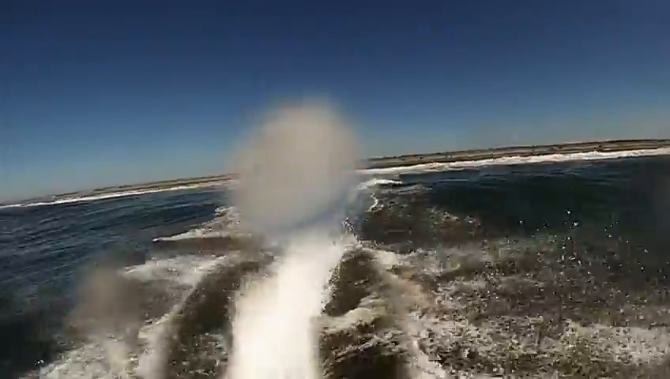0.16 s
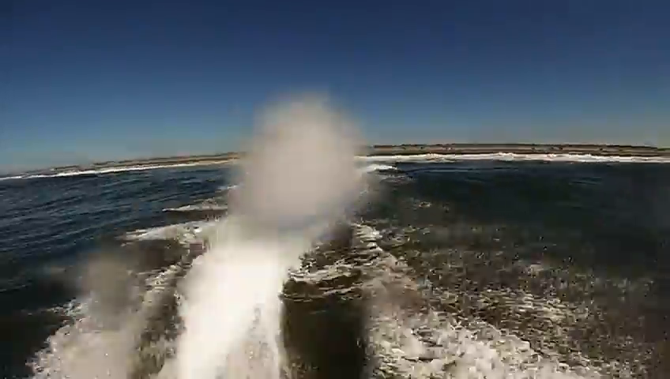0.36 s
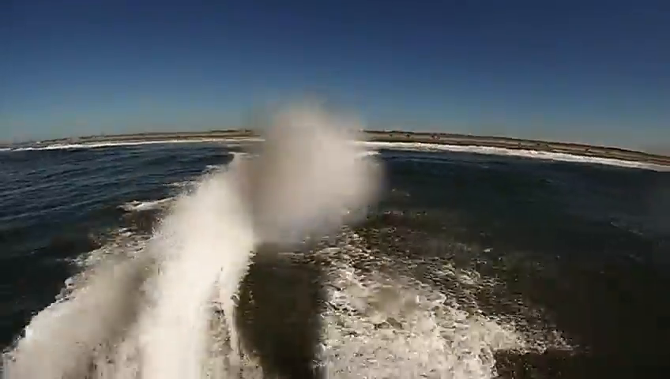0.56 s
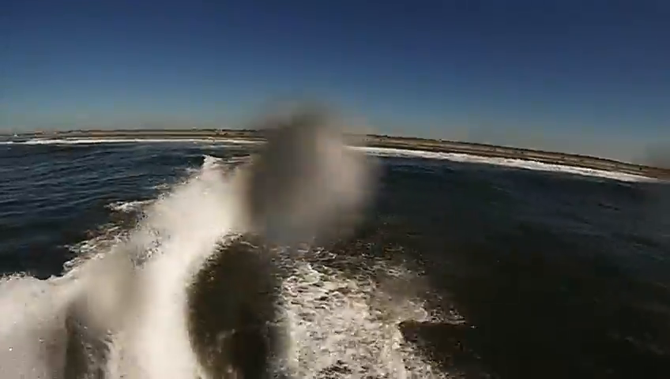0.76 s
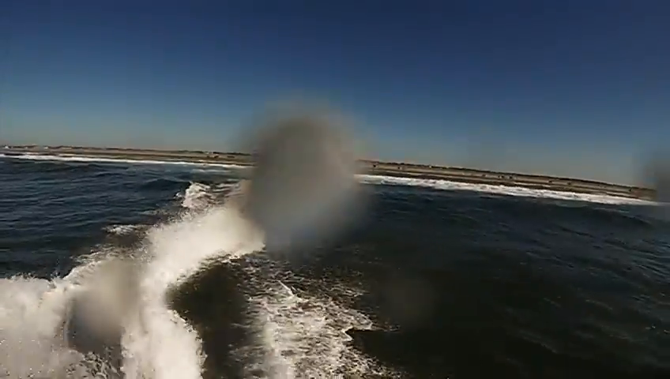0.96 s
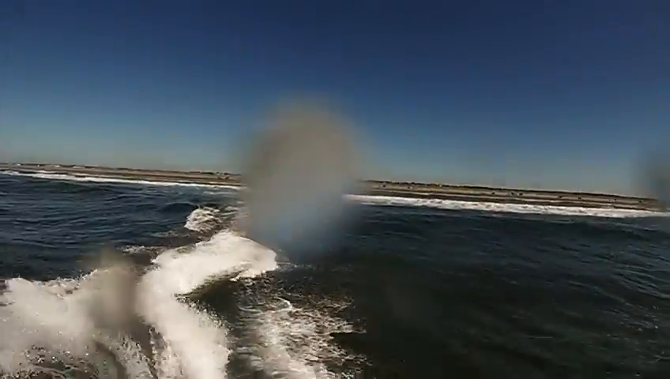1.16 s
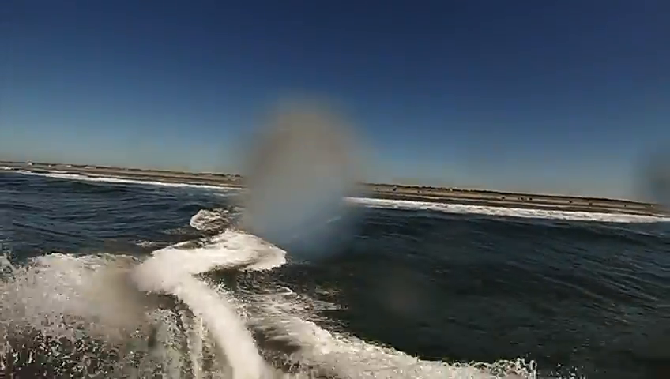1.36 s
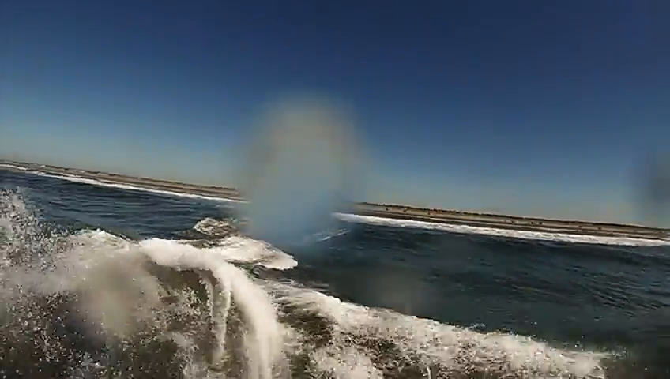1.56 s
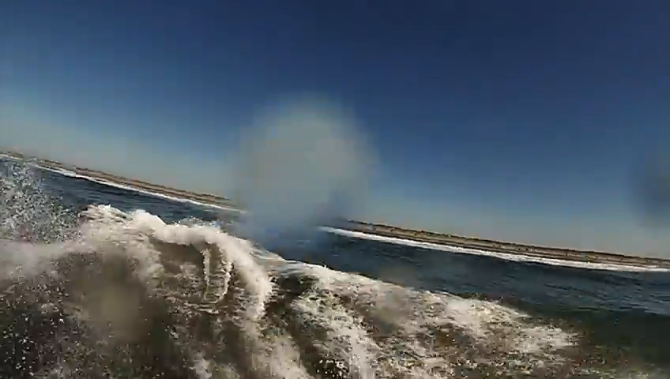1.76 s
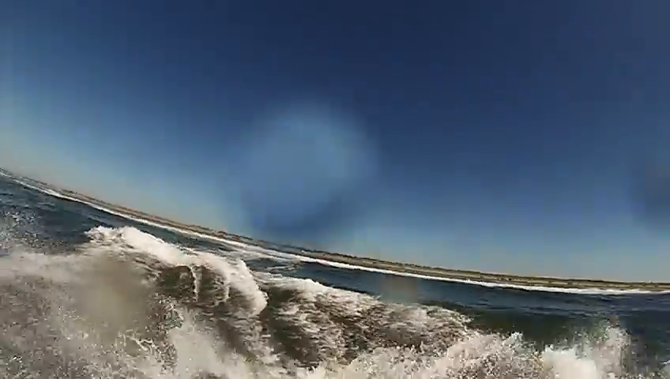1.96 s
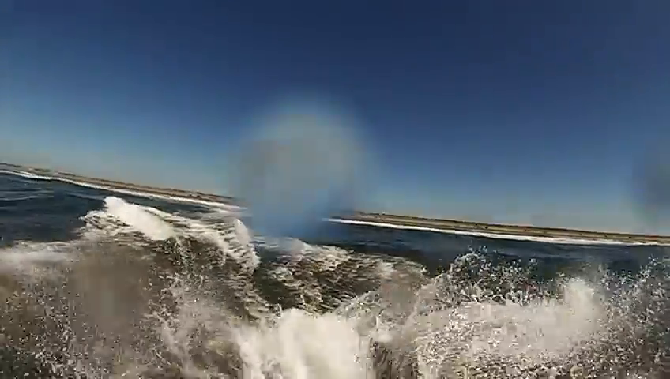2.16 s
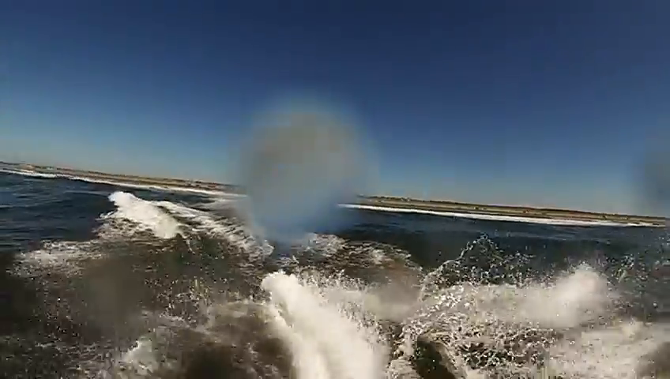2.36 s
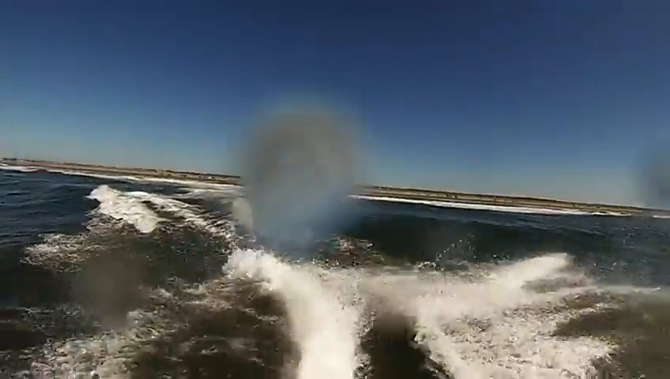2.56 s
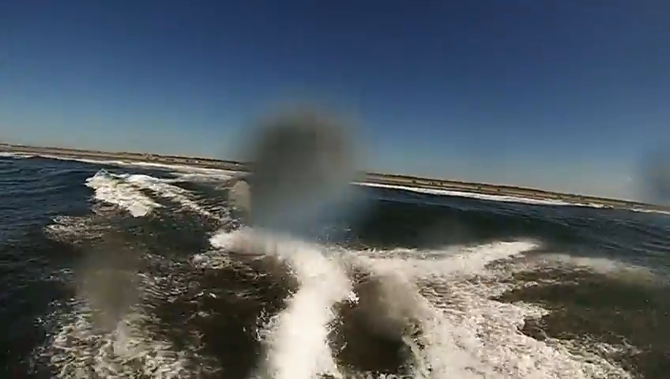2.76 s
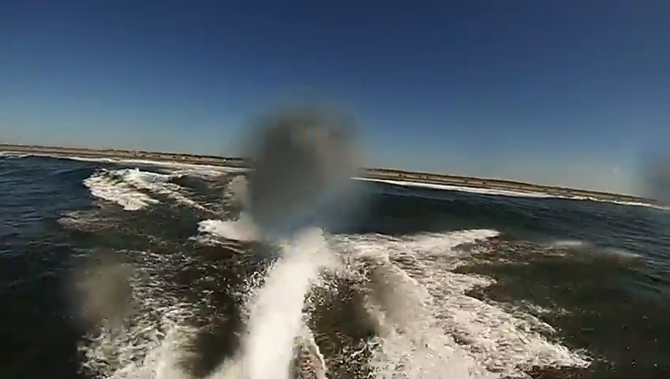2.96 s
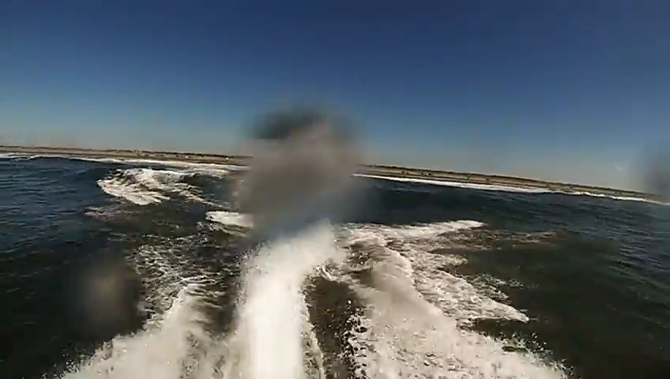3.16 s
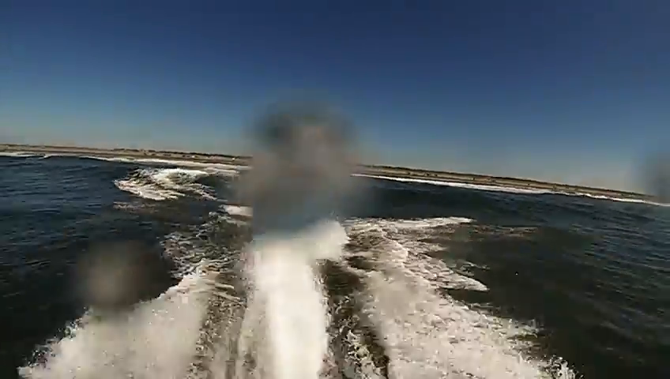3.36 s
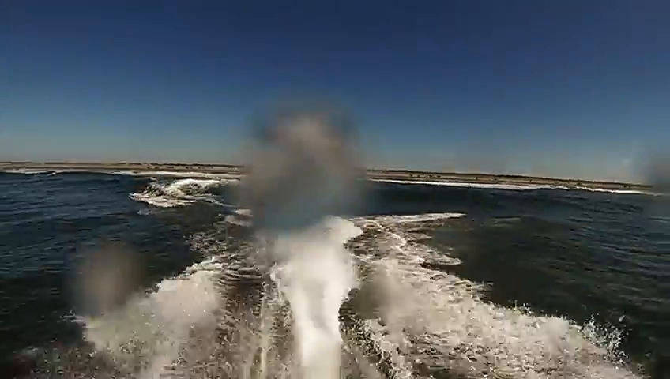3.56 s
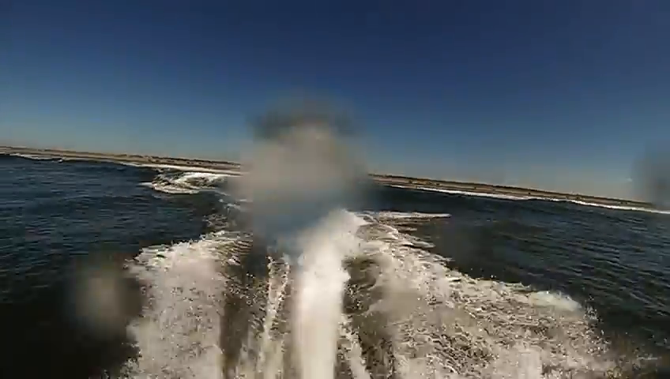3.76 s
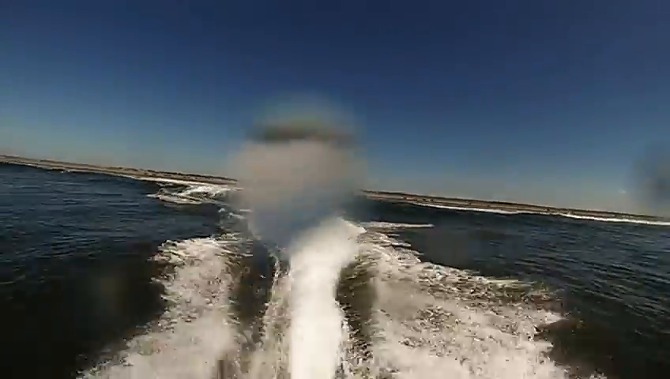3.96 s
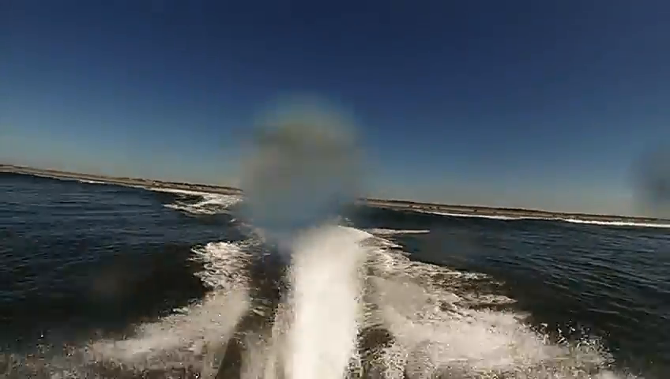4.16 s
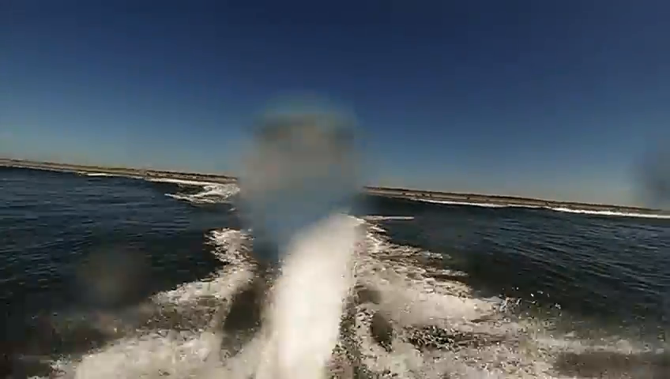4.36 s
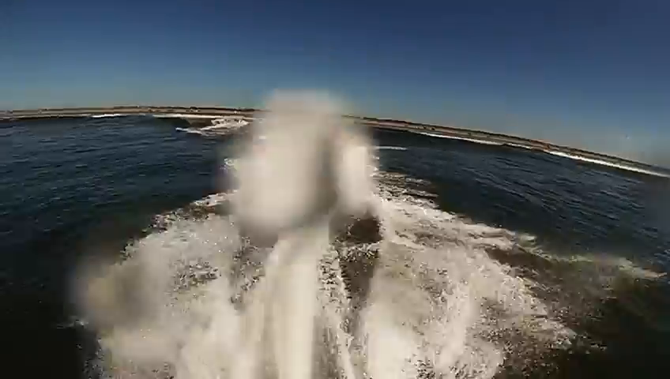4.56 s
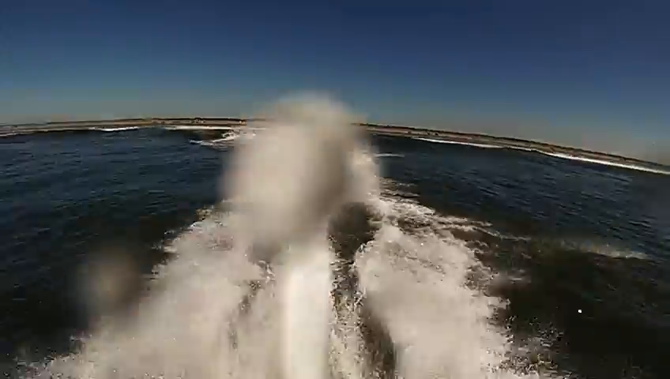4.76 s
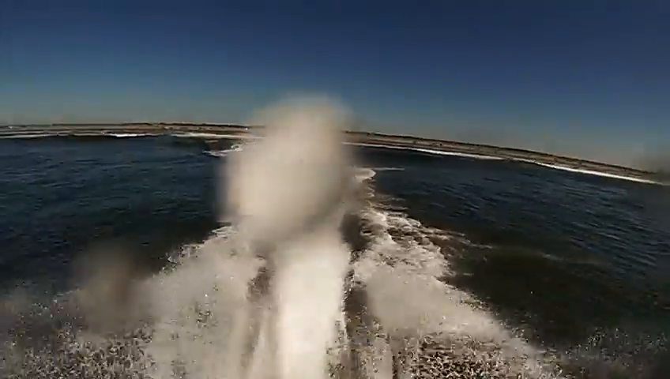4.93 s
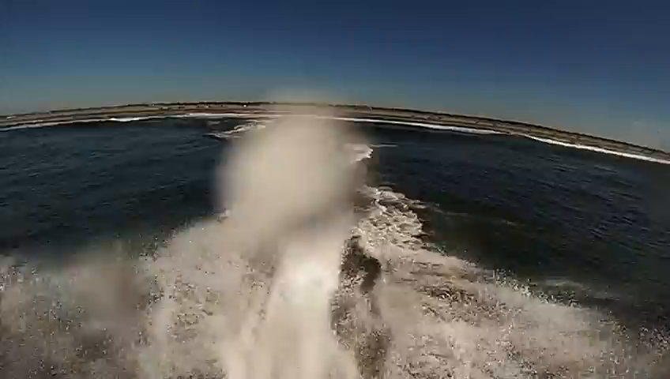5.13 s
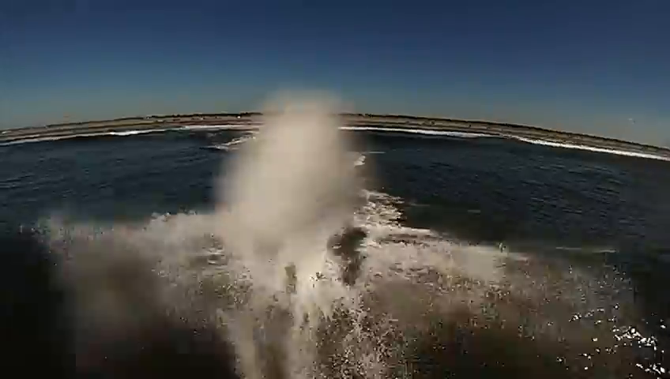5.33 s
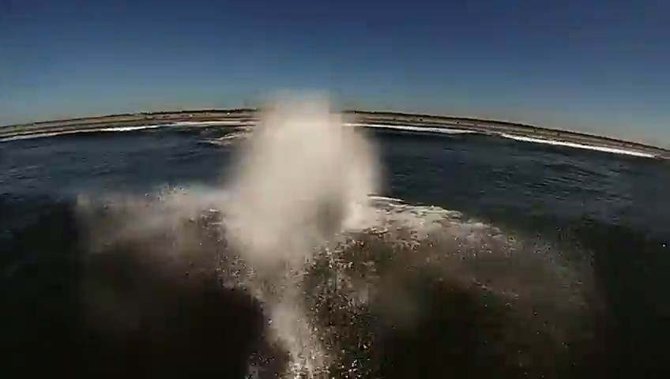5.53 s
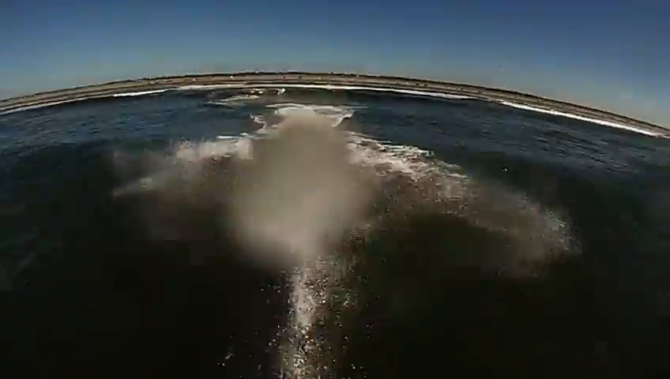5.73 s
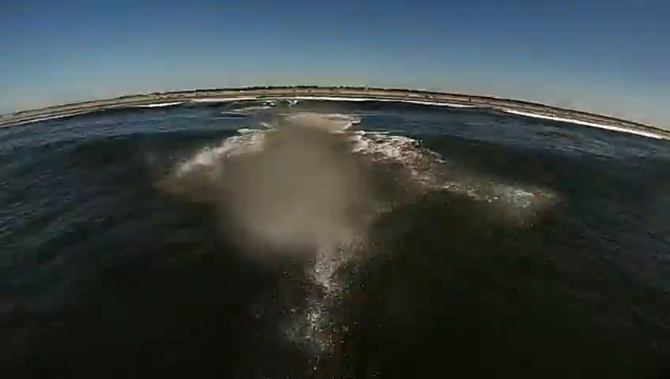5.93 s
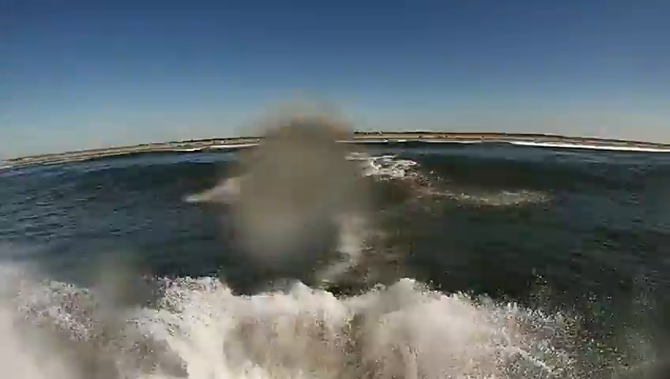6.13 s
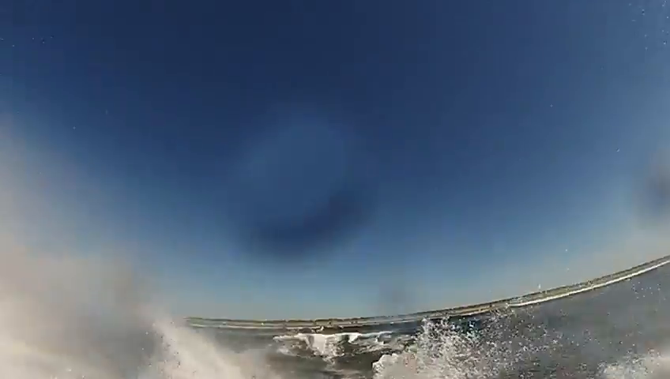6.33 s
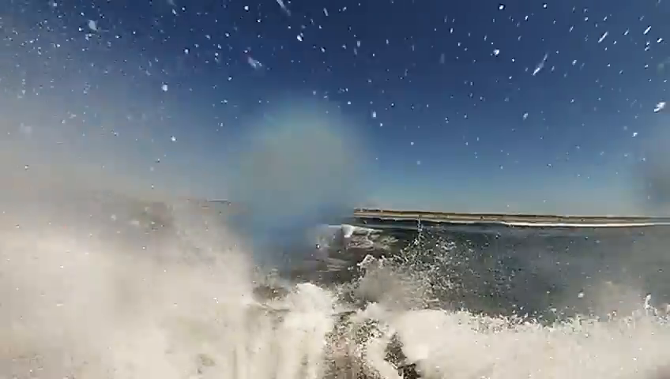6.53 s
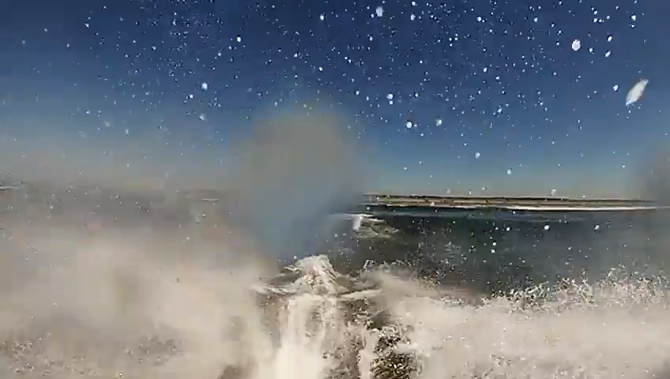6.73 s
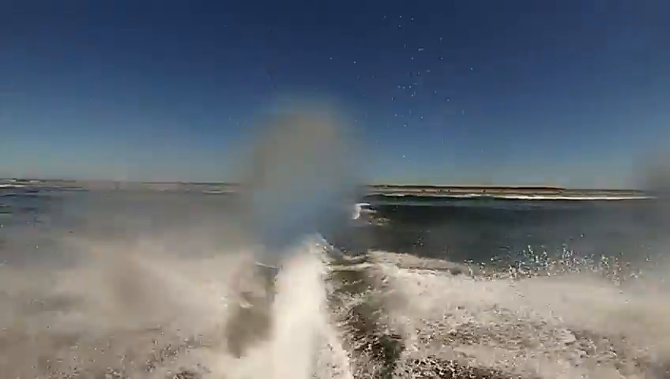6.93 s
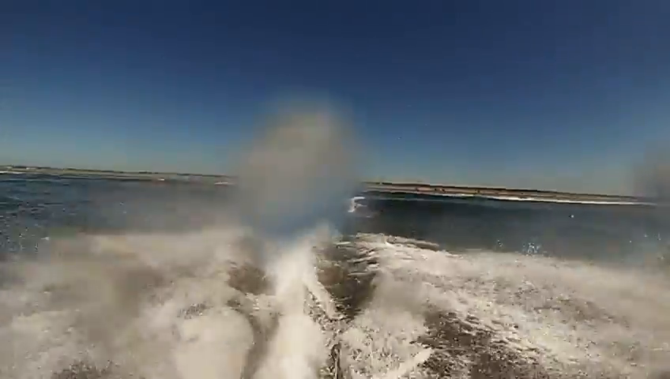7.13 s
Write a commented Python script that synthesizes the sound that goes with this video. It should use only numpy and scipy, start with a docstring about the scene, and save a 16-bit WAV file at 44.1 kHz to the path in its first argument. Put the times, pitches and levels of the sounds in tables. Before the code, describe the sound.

Close at a small watercraft's stern, a buzzing engine revs and eases under roaring wash, with heavy booming hull slaps and a late patter of drops.

```python
"""Personal watercraft in surf

Heard from a waterproof camera on the stern: a three-cylinder engine, summed from crankshaft harmonics,
revs and eases under the filtered noise of wash, jet, foam and mist, while the camera mount drones.
Decaying sines and noise bursts form the hull's slams after two jumps; then thrown water rattles on
the housing as short damped rings, and a gliding tone gurgles as the stern settles."""
import sys
import numpy as np
from scipy.fft import rfft, irfft, next_fast_len
from scipy.io import wavfile
from scipy.ndimage import uniform_filter1d, map_coordinates

SR = 44100
rng = np.random.default_rng(int(sys.argv[2]) if len(sys.argv) > 2 else 0)


def file_out(sig):
    """Save sig as 16-bit WAV at sys.argv[1]."""
    # one column per channel
    cols = np.atleast_2d(sig).T
    # limit, then scale
    lim = np.clip(cols, -1, 1)
    pcm = np.round(lim * 32767).astype(np.int16)
    wavfile.write(sys.argv[1], SR, pcm)


N = 317079  # length [samples]

# Two throttle blips, then the run-up to the big jump; after it the sunken stern muffles the exhaust:
# (time [s], crankshaft rate [Hz], exhaust gain [dB])
ENGINE_COURSE = [(0, 79.3, -52), (.14, 87.8, -33), (.26, 97.2, -34), (.38, 100.9, -35.5), (.5, 98.9, -32.5),
                 (.62, 85.5, -30), (.74, 75.45, -44), (.93, 64, -38), (1.08, 58, -63), (2.06, 59.8, -58),
                 (2.18, 78.9, -43.5), (2.29, 88.2, -34.5), (2.42, 94.45, -31.5), (2.53, 92.1, -30),
                 (2.72, 86.2, -30.5), (2.9, 84.34, -34), (3.08, 85.1, -32.5), (3.25, 88.3, -32),
                 (3.42, 92.66, -28.5), (3.75, 92.5, -33.5), (3.9, 96.1, -40.5), (4.1, 107, -37),
                 (4.28, 115.7, -41), (4.6, 119.7, -37), (4.8, 123.5, -42), (5.7, 124.2, -42),
                 (6.1, 119, -59), (6.7, 100, -52), (6.94, 98.7, -41), (7.0, 99, -49), (7.19, 99, -56)]
# Engine orders: (multiple of crankshaft rate, level at throttle share 0 [dB], level at share 1 [dB])
ENGINE_ORDERS = [(1.5, -5.5, 4.5), (2, -24, -14), (2.5, -28, -3), (3, 1, -6), (4, -30, -3), (4.5, -13, -10),
                 (5.5, -28, -4), (6, -21.5, -7), (7, -28, -13), (7.5, -21, -9), (8, -29, -11), (9, -30, -9),
                 (9.5, -26, -8), (10.5, -25, -6), (12, -25, -5)]
# Throttle share against engine speed: (crankshaft rate [Hz], share [0-1])
THROTTLE_SHARE = [(106, 0.0083), (114, 0.79)]
# Hull resonances: (frequency [Hz], width [Hz], level [dB])
HULL_MODES = [(174.7, 4.2, 2), (384, 9.2, -14), (570, 30, 0), (685.7, 30, -1.5), (733, 23, -1)]
FLYWHEEL_S = 0.062  # averaging time by which the engine's inertia rounds off speed changes
FIRING_JITTER_RAD = 0.03

# Rush of water swelling with speed: (time [s], wash level before gain [dB], jet level before gain [dB])
WATER_COURSE = [(0, -37.5, -46), (.45, -36.5, -46), (.87, -39, -46.5), (1.37, -46, -65), (1.7, -45.5, -58),
                (2.05, -46.5, -60), (2.33, -39, -49), (2.94, -38.5, -44), (3.24, -36, -41.5),
                (3.85, -34.5, -39.5), (4.15, -32, -34), (4.5, -31, -35.5), (4.94, -27, -28.5),
                (5.2, -26.5, -28.5), (5.68, -29.5, -33), (6.27, -31.5, -44), (6.32, -25, -30),
                (6.37, -34, -42.5), (6.5, -43.5, -50), (7.03, -40, -46.5), (7.19, -35, -46)]
# Spectrum of the wash: (frequency [Hz], relative level [dB])
WASH_SPECTRUM = [(40, 11), (110, 16.5), (170, 9), (300, 5), (420, 0.5), (850, -3.5), (1500, 0.5),
                 (2300, -3), (2850, -7), (3100, -13.5), (3800, -12.5), (5200, -18), (7800, -24),
                 (9000, -49), (12000, -96)]
# Spectrum of the jet's spray: (frequency [Hz], relative level [dB])
JET_SPECTRUM = [(1000, -11.5), (2300, 2.5), (2800, 2), (3150, -10), (3600, -1), (4400, -12.5), (5100, -5),
                (6000, -20), (8200, -45), (9000, -73), (12000, -63)]
# Resonances of housing and mount: (frequency [Hz], width of one stage [Hz], level per stage pair [dB])
HOUSING_MODES = [(264, 60, -5), (328, 50, -2), (540, 67, -20), (719, 124, 0.5), (1125, 280, 0.5),
                 (1600, 430, 1), (2190, 125, 0.5), (3580, 180, -13)]
# Resonances of the lid in the jet: (frequency [Hz], width of one stage [Hz], relative level [dB])
LID_MODES = [(4395, 395, 3.5), (7960, 280, -21.5)]
# Bands where mist makes the housing sizzle: (frequency [Hz], width of one stage [Hz], relative level [dB])
MIST_BANDS = [(5740, 700, -1.5), (6950, 720, -2.5), (8020, 770, 1), (9370, 530, -10.5)]
# Thick mist sweeping over the camera at top speed: (time [s], level [dB])
SIZZLE_LEVEL = [(3, -82), (4.1, -67), (4.8, -57.5), (4.97, -46.5), (5.12, -44), (5.24, -49.5), (5.35, -57),
                (5.75, -59), (6.4, -81)]
SIZZLE_FLICKER_DB, SIZZLE_GRAINS_PER_S = 3, 1600
WASH_GAIN_DB, JET_GAIN_DB = 3.0, -1.5
TAKEOFF_S, LANDING_S = 5.76, 6.27  # the big jump
JET_CUT_S, JET_CUT_DB = 0.12, -40  # the jet dies while its intake is out of the water

# Spectrum of the foam: (frequency [Hz], relative level [dB])
FOAM_SPECTRUM = [(300, -4), (550, 13.5), (900, -16), (2600, -14), (3700, 10), (6000, -15), (8500, -22),
                 (10500, -12.5), (12300, -31)]
# Spectrum of the finest fizz: (frequency [Hz], relative level [dB])
FIZZ_SPECTRUM = [(3000, -38), (5000, 7.5), (6500, 1), (8700, -5.5), (10000, -6.5), (11200, -5),
                 (12300, -30)]
# The finest fizz follows the first two blips, then dulls: (time [s], level [dB])
FIZZ_LEVEL = [(0, -52.5), (.5, -54.5), (1, -57), (1.35, -64), (1.65, -60), (2, -62), (2.3, -53.5),
              (2.7, -55), (2.85, -72.5), (7.19, -62.5)]
# Gliding gurgle as the stern settles: (time [s], pitch [Hz], level of the fundamental [dB])
GURGLE_COURSE = [(6.99, 623, -70), (7.004, 574, -46), (7.024, 455, -35), (7.05, 452, -41), (7.08, 480, -47),
                 (7.11, 534, -39), (7.135, 547, -42), (7.16, 577, -75)]

# Spectrum of the buffeting: (frequency [Hz], relative level [dB])
BUFFET_SPECTRUM = [(8, 11), (20, 22), (35, 9), (55, 14), (120, -6), (300, -66), (800, -100)]
# Shudders of the hull after each jump: (time [s], starting level [dB], 60 dB decay time [s])
HULL_SHUDDERS = [(1.84, -16, 0.98), (6.27, -13, 0.77)]
# Slaps over chop that set the mount droning: (time of peak [s], level [dB])
CHOP_BUMPS = [(0.14, -20.5), (0.494, -24.5), (0.878, -25.5), (1.872, -21), (2.1, -31), (3.339, -27.5),
              (3.801, -23), (3.94, -24), (4.211, -24.5), (4.337, -23), (4.662, -18), (4.842, -11),
              (4.94, -20), (5.194, -15.5), (5.38, -11), (5.564, -43), (5.773, -13), (6.177, -15),
              (6.244, -16.5), (6.375, -18), (6.41, -24), (6.824, -24.5)]
BUMP_RISE_S, BUMP_FALL_S = 0.022, 0.026  # Gaussian time constants of each surge
CRUISE_DB = -36.5  # wash level before gain at cruising speed
BUFFET_DB, BUFFET_GROWS = -34.5, 0.3  # at cruise, and dB per dB of wash
CHOP_DRONE_DB, CHOP_DRONE_GROWS = -32.5, 0.67  # drone kept up by chop: at cruise, and dB per dB of wash
SPEED_DRONE_DB, SPEED_DRONE_DB_PER_HZ = -22, 1.8  # at top speed, and slope with crankshaft rate
TOP_SPEED_HZ = 123.5  # crankshaft rate flat out
MOUNT_HZ, MOUNT_WIDTH_HZ = 84.6, 16.7  # the mount's own resonance, width of one stage

# Hull meeting water: (time [s], heave level [dB], heave frequency [Hz], knock level before gain [dB],
# splash level [dB], contact rise time to peak [s])
HULL_SLAMS = [(1.807, 0, 18.5, -12, -34, 0.029), (1.88, -11, 14.7, -33, -56, 0.016),
              (1.955, -15.5, 12, -49, -62, 0.01), (6.138, -5.5, 35, -24, -35, 0.016),
              (6.259, -2.5, 18.3, -16.5, -21.5, 0.025), (6.296, -11, 10.4, -27, -26, 0.016),
              (6.338, -3, 39, -18, -33, 0.014)]
# Housing tones rung by a landing: (frequency [Hz], pitch wander [Hz], relative level [dB])
KNOCK_TONES = [(266, 20.05, -0.5), (545, 50, -11.5), (715, 31, -11), (1119, 67.8, -8.5), (1460, 110, -23)]
# Dull blow under the ring: (frequency [Hz], relative level [dB])
THUD_SPECTRUM = [(100, 18), (300, 4), (700, -7), (1400, -2.5), (2500, -37), (8000, -46)]
# Spectrum of a splash: (frequency [Hz], relative level [dB])
SPLASH_SPECTRUM = [(100, 12), (700, 8.5), (1800, 9), (4000, -1.5), (6200, -8.5), (9000, -26), (12000, -35)]
# Lid resonances under a direct strike: (frequency [Hz], width of one stage [Hz], level per stage pair [dB])
STRUCK_LID_MODES = [(3830, 380, 2), (4450, 820, -7)]
HEAVE_LAG_S = 0.012  # the heave follows first contact
KNOCK_RING_DB, KNOCK_THUD_DB = -6.5, -5
SPLASH_GRAINS_PER_S, SPLASH_SPREAD_DB = 2500, 2

# Single drops on the housing: (time [s], peak before direct gain [dB], ring [Hz], decay constant [cycles])
BIG_DROPS = [(1.93, -24, 1750, 0.63), (1.9347, -21, 1660, 0.62), (1.951, -23, 1720, 0.59),
             (6.15, -16, 1200, 0.53), (6.153, -13, 1227, .4), (6.337, -8.5, 2250, 0.59),
             (6.356, -18, 1100, 0.25), (6.586, -12.5, 1165, 0.42), (6.592, -12.5, 2140, 0.67),
             (6.623, -1.5, 1080, 0.32), (6.632, -17, 1460, 0.55), (6.638, -12, 1350, 0.55),
             (6.646, -9.5, 1400, 0.63), (6.661, -7.5, 1280, 0.19), (6.68, -15, 1300, .35),
             (6.693, -14, 1250, 0.25), (6.719, -18, 1130, 0.34), (6.731, -13, 2200, 0.82),
             (6.752, -8, 1295, 0.52), (6.755, -15, 1410, .7), (6.766, -1.5, 1060, 0.16),
             (6.7724, -7, 1140, 0.17), (6.7744, -5, 1140, 0.18), (6.779, -2, 1210, 0.24),
             (6.7865, -3.5, 1020, 0.14), (6.7938, -5, 1590, 0.59), (6.796, -11, 1920, 1),
             (6.7982, -12, 2220, 0.48), (6.8054, 2, 920, 0.13), (6.8117, -10, 1200, 0.33),
             (6.8183, -6, 1010, 0.225), (6.827, -13, 2400, 0.61), (6.8347, 1.5, 795, 0.12),
             (6.8382, -22, 900, .4)]
# Sheets of falling water: (time [s], length [s], starting level [dB], final level [dB]), before direct gain
WATER_SHEETS = [(6.577, 0.06, -30.5, -28), (6.628, 0.072, -28.5, -27), (6.708, 0.046, -24, -27.5),
                (6.753, 0.075, -27, -32)]
# Sharp spatters of fine water: (time [s], level before direct gain [dB], 60 dB decay time [s])
FINE_SPATTERS = [(1.816, -30, 0.18), (6.1469, -11, 0.076)]
# Thin cracks of fast drops on the microphone port: (time [s], level [dB], 60 dB decay time [s])
PORT_CRACKS = [(5.8725, -21.5, .008), (6.1293, -12, 0.0067), (6.762, -25, 0.011), (6.7685, -23, 0.011),
               (6.7785, -25, 0.01), (6.798, -18, .016), (6.8263, -16, 0.015)]
# Spectrum of the finest drops' patter: (frequency [Hz], relative level [dB])
PATTER_SPECTRUM = [(120, -4), (250, -2), (700, -2.5), (1150, 0.5), (2300, -5.5), (3200, -15.5), (5000, -19),
                   (9000, -35.5), (12000, -63)]
# Spectrum of a crack: (frequency [Hz], relative level [dB])
CRACK_SPECTRUM = [(800, -2), (2400, 5), (3700, 1), (5200, -7), (7500, -16.5), (9000, -21), (12000, -32)]
# Narrow shell modes set ringing by every drop: (frequency [Hz], width [Hz], relative level [dB])
SHELL_MODES = [(576, 21, -8), (630, 27, 1), (700, 30, 3), (960, 23, -8), (1096, 40, 0), (1180, 63, 2),
               (1267, 25, -7), (1400, 51, -6), (2140, 75, 5)]
SHEET_EDGE_S = 0.026  # rise and fall of each sheet
SMALL_DROPS_PER_S, SMALL_DROP_DB = 400, 5.5  # peak level relative to the sheet
SMALL_DROP_HZ, SMALL_DROP_OCTAVES = 1764, 0.45  # central ring, and its scatter
PATTER_DB, PATTER_FLUTTER_DB = 1, 1.1  # relative to the sheet
DIRECT_DB, SHELL_DB = -2.5, -8.5  # the drops' own sound, and the shell's answer

TOP_HZ = 12300  # the camera's band limit


def amp(db):
    """Logarithmic level: decibels become an amplitude ratio."""
    return 10 ** (np.asarray(db) / 20)


def unit(x):
    """Normalisation: scale to rms 1."""
    return x / np.sqrt(np.mean(x ** 2) + 1e-20)


def curves(rows):
    """Linear interpolation: one value per sample for each column after the time."""
    s, *columns = np.transpose(rows)
    t = np.arange(N) / SR
    return [np.interp(t, s, column) for column in columns]


def wobble(rate):
    """Band-limited fluctuation: a smooth random curve with rate knots a second."""
    knots = rng.standard_normal(int(N * rate / SR) + 4)
    return map_coordinates(knots, [np.arange(N) * rate / SR])


def filtered(x, response):
    """Linear filtering: multiply the spectrum by a response of frequency."""
    size = next_fast_len(N + SR // 2)  # padding leaves room for the tail
    hz = np.fft.rfftfreq(size, 1 / SR)
    return irfft(rfft(x, size) * response(hz), size)[:N]


def colour(x, points):
    """Spectral shaping: levels interpolated over log frequency, result at rms 1."""
    f, db = np.transpose(points)
    return unit(filtered(x, lambda hz: amp(np.interp(np.log(hz + 1), np.log(f), db))))


def ring(x, modes, order=1):
    """Modal superposition: parallel resonances, with steeper skirts at a higher order."""
    def response(f):
        return sum(amp(db) * (1j * f * width / (centre ** 2 - f * f + 1j * f * width)) ** order
                   for centre, width, db in modes)
    return filtered(x, response)


def noise():
    """Random excitation: white noise."""
    return rng.standard_normal(N)


def grains(rate, spread_db):
    """Shot noise: random impulses of uneven size, at rms 1."""
    struck = rng.random(N) < rate / SR
    return unit(struck * noise() * amp(spread_db * noise()))


def since(s):
    """Elapsed time: seconds after a moment, zero before it."""
    return np.maximum(np.arange(N) / SR - s, 0)


def ramp(s, length):
    """Smooth transition: a sine step from 0 to 1, centred on a moment."""
    return .5 + .5 * np.sin(np.pi * np.clip((np.arange(N) / SR - s) / length, -.5, .5))


def add(track, s, sound):
    """Superposition: mix a short sound in at a time."""
    part = track[round(s * SR):][:len(sound)]
    part += sound[:len(part)]


def crank_hz():
    """Rotational inertia: a moving average rounds off the crankshaft's rate."""
    return uniform_filter1d(curves(ENGINE_COURSE)[0], int(FLYWHEEL_S * SR))


def engine():
    """Periodic combustion: three cylinders fire 1.5 times a turn; more throttle fills in other orders."""
    shaft_hz = crank_hz()
    exhaust_db = curves(ENGINE_COURSE)[1]
    crank = 2 * np.pi * np.cumsum(shaft_hz * (1 + 0.0027 * wobble(30))) / SR
    crank = crank + FIRING_JITTER_RAD * wobble(150)  # uneven firing roughens the high orders
    throttle = np.interp(shaft_hz, *np.transpose(THROTTLE_SHARE))
    tone = np.zeros(N)
    for order, part_db, full_db in ENGINE_ORDERS:
        level = part_db + throttle * (full_db - part_db)
        flutter = (1.64 - 0.044 * level) * wobble(14)  # weak orders fade in and out the most
        tone += amp(level + flutter) * np.sin(order * crank + rng.uniform(0, 2 * np.pi))
    tone *= 1 + 0.17 * wobble(120)  # the wet exhaust burbles
    return amp(exhaust_db) * (tone + ring(tone, HULL_MODES))


def airborne():
    """Loss of immersion: 1 during the big jump, 0 on the water."""
    return ramp(TAKEOFF_S + JET_CUT_S / 2, 2 * JET_CUT_S) - ramp(LANDING_S, JET_CUT_S)


def water():
    """Turbulence exciting resonators: wash sounds the housing, spray the lid, mist a high sizzle."""
    wash_db, jet_db = curves(WATER_COURSE)
    churn = amp(0.52 * wobble(14) + 0.22 * wobble(90))
    open_wash = colour(noise() + 0.5 * grains(2500, 4.7), WASH_SPECTRUM)
    wash = open_wash + amp(-8.0) * unit(ring(noise(), HOUSING_MODES, order=2))
    spray = colour(noise() + 0.6 * grains(3000, 2.8), JET_SPECTRUM)
    jet = unit(ring(noise(), LID_MODES, order=2)) + amp(-2.5) * spray
    wash_gain = amp(wash_db + WASH_GAIN_DB)
    jet_gain = amp(jet_db + JET_GAIN_DB + JET_CUT_DB * airborne())
    sizzle_gain = amp(curves(SIZZLE_LEVEL)[0] + SIZZLE_FLICKER_DB * wobble(70))
    sizzle = unit(ring(grains(SIZZLE_GRAINS_PER_S, 1.6), MIST_BANDS, order=2))
    return churn * (wash_gain * wash + jet_gain * jet) + sizzle_gain * sizzle


def foam():
    """Broadband noise and a gliding tone: foam fizzes; a gurgle dips and rises as the stern settles."""
    fizz = amp(curves(FIZZ_LEVEL)[0]) * colour(noise(), FIZZ_SPECTRUM)
    bed = amp(-55.5) * colour(noise(), FOAM_SPECTRUM)
    gurgle_hz, gurgle_db = curves(GURGLE_COURSE)
    phase = 2 * np.pi * np.cumsum(gurgle_hz * (1 + 0.024 * wobble(150))) / SR
    gurgle = np.sin(phase) + amp(-9) * np.sin(2 * phase)
    return bed + fizz + amp(gurgle_db) * gurgle


def pace():
    """Relative level: how far the wash stands above its cruising level, in dB."""
    return curves(WATER_COURSE)[0] - CRUISE_DB


def shaking():
    """Forced vibration: wind, chop and landings buffet the camera; its mount drones, surging at bumps."""
    shudder = sum(amp(db - 60 * since(s) / t60) * ramp(s, 0.11) for s, db, t60 in HULL_SHUDDERS)
    # independent causes add in power
    buffet_gain = np.hypot(amp(BUFFET_DB + BUFFET_GROWS * pace()), shudder)
    buffet = buffet_gain * colour(noise(), BUFFET_SPECTRUM)
    chop_drive = amp(CHOP_DRONE_DB + CHOP_DRONE_GROWS * pace())
    speed_drive = amp(SPEED_DRONE_DB + SPEED_DRONE_DB_PER_HZ * (crank_hz() - TOP_SPEED_HZ))
    mount = unit(ring(noise(), [(MOUNT_HZ, MOUNT_WIDTH_HZ, 0)], order=2))
    drone = np.hypot(chop_drive, speed_drive) * mount
    t = np.arange(N) / SR
    surges = np.zeros(N)
    for s, db in CHOP_BUMPS:
        width = np.where(t < s, BUMP_RISE_S, BUMP_FALL_S)
        surges += amp(db) * np.exp(-((t - s) / width) ** 2)
    sway = unit(np.sin(2 * np.pi * np.cumsum(MOUNT_HZ + 3 * wobble(20)) / SR))
    return buffet + drone + surges * sway


def splashing(x):
    """Impact excitation: water on the camera makes a broad splash that also rings the lid."""
    splash = colour(x, SPLASH_SPECTRUM)
    return unit(splash + ring(splash, STRUCK_LID_MODES, order=2))


def slams():
    """Impact and damping: landings heave the camera, ring its housing and throw a sheet of water."""
    heave, knock, splash = np.zeros((3, N))
    for s, heave_db, heave_hz, knock_db, splash_db, rise in HULL_SLAMS:
        t, pushed = since(s), since(s + HEAVE_LAG_S)
        dig = pushed * heave_hz / 0.48
        swell = dig * np.exp((1 - dig ** 2) / 2)  # the hull digs in, then water damps it after one swing
        heave -= amp(heave_db) * swell * np.sin(2 * np.pi * heave_hz * pushed)
        contact = (t / rise) ** 2 * np.exp((1 - (t / rise) ** 4) / 2)
        knock += amp(knock_db) * contact
        splash += amp(splash_db) * contact
    ringing = sum(amp(db) * np.sin(2 * np.pi * np.cumsum(hz + wander * wobble(200)) / SR)
                  for hz, wander, db in KNOCK_TONES)
    thud = colour(noise(), THUD_SPECTRUM)
    blow = amp(KNOCK_RING_DB) * ringing + amp(KNOCK_THUD_DB) * thud
    sheet = splashing(grains(SPLASH_GRAINS_PER_S, SPLASH_SPREAD_DB) + 1.1 * noise())
    return heave + knock * blow + splash * sheet


def bursts(rows):
    """Exponential decay: each row rises suddenly and dies quickly."""
    return sum(amp(db - 60 * since(s) / t60) * (1 - np.exp(-since(s) / 0.00028)) for s, db, t60 in rows)


def drop(hz, cycles):
    """Damped oscillation: a drop taps the wet housing with a brief dull ring and a soft start."""
    turns = hz * np.arange(SR // 80) / SR
    tap = np.sin(2 * np.pi * turns) * turns ** 2 * np.exp(-turns / cycles)
    return tap / np.abs(tap).max()


def sheet_levels():
    """Amplitude envelope: the level of the water sheets falling back on the housing."""
    sheets = np.zeros(N)
    for s, length, first_db, last_db in WATER_SHEETS:
        level = amp(np.interp(since(s), [0, length], [first_db, last_db]))
        sheets += level * (ramp(s, SHEET_EDGE_S) - ramp(s + length, SHEET_EDGE_S))
    return sheets


def falling_spray():
    """Impulsive modal excitation: big and small drops, patter and spatters ring the shell; cracks join."""
    taps = np.zeros(N)
    sheets = sheet_levels()
    for s, db, hz, cycles in BIG_DROPS:
        add(taps, s, amp(db) * drop(hz, cycles))
    hits = np.flatnonzero((rng.random(N) < SMALL_DROPS_PER_S / SR) & (sheets > 0))
    peak = sheets * amp(SMALL_DROP_DB)
    pitch = SMALL_DROP_HZ * 2 ** (SMALL_DROP_OCTAVES * np.clip(noise(), -2, 1))
    for i in hits:
        cycles = 0.28 * (pitch[i] / 1200) ** 1.84  # smaller drops ring for more cycles
        add(taps, i / SR, peak[i] * drop(pitch[i], cycles))
    patter_gain = sheets * amp(PATTER_DB + PATTER_FLUTTER_DB * wobble(110))
    patter = patter_gain * colour(grains(1800, 0.82) + 0.44 * noise(), PATTER_SPECTRUM)
    spatters = bursts(FINE_SPATTERS) * splashing(noise())
    strikes = taps + patter + spatters
    cracks = bursts(PORT_CRACKS) * colour(noise(), CRACK_SPECTRUM)
    return amp(DIRECT_DB) * strikes + amp(SHELL_DB) * ring(strikes, SHELL_MODES) + cracks


def scene():
    """Superposition of sources: engine, water and blows, all at the camera."""
    return (engine() + water() + foam() + shaking() + slams() + falling_spray())[None]


def record(dry):
    """Saturation and band limiting: the camera rounds off the largest peaks and cuts the top."""
    soft = dry[0] / (1 + dry[0] ** 8) ** (1 / 8)
    return filtered(soft, lambda hz: hz < TOP_HZ)[None]


dry = scene()
out = record(dry)
file_out(out)
```